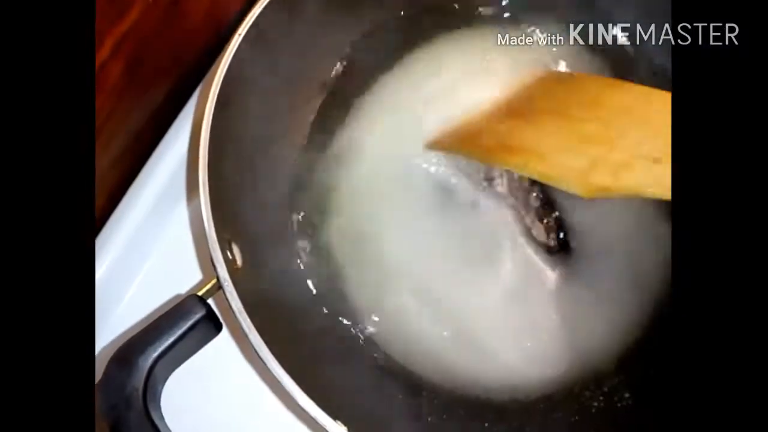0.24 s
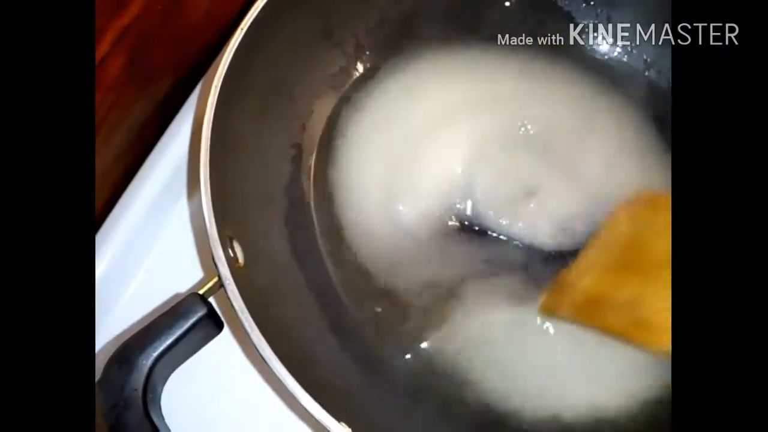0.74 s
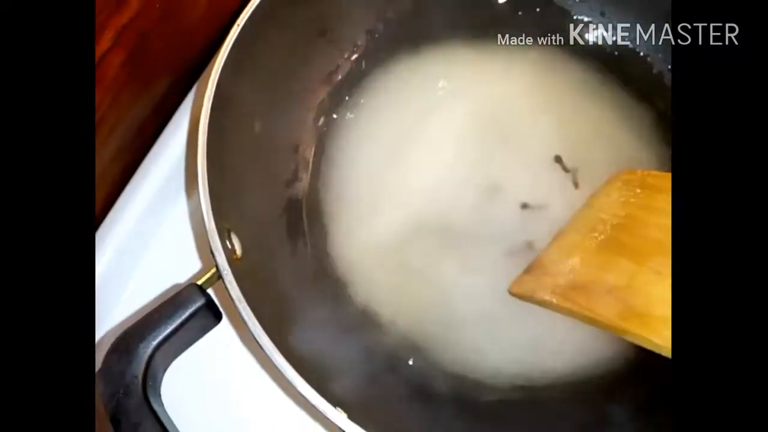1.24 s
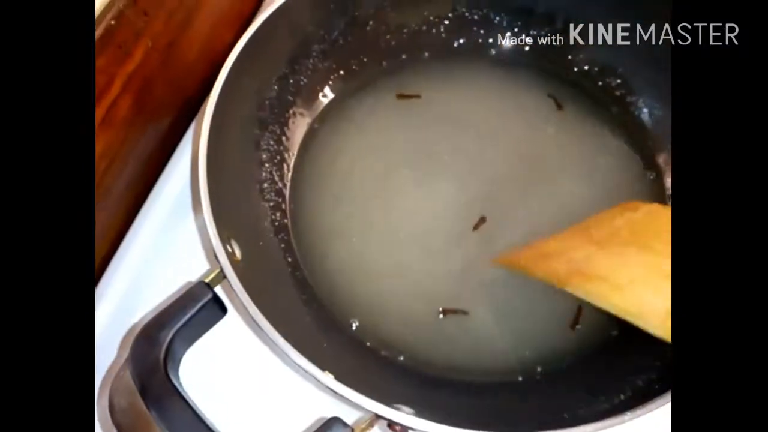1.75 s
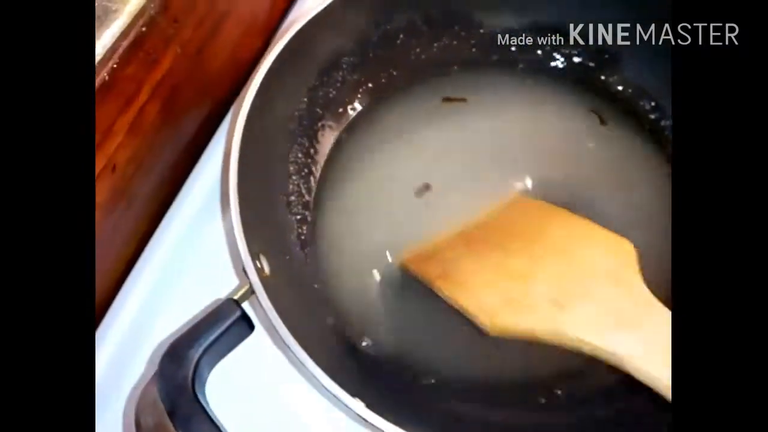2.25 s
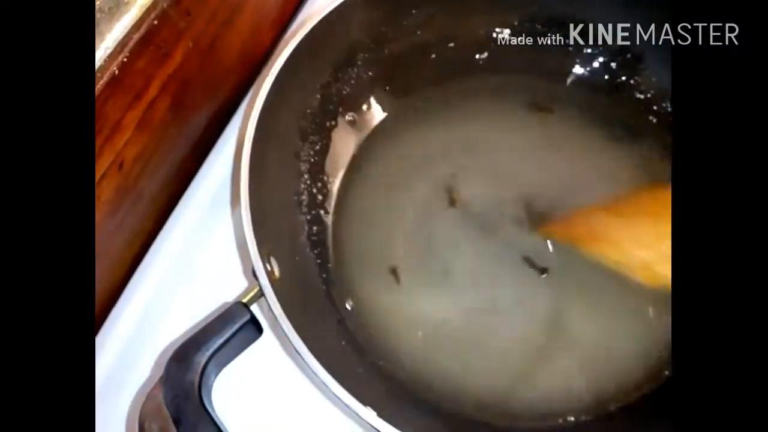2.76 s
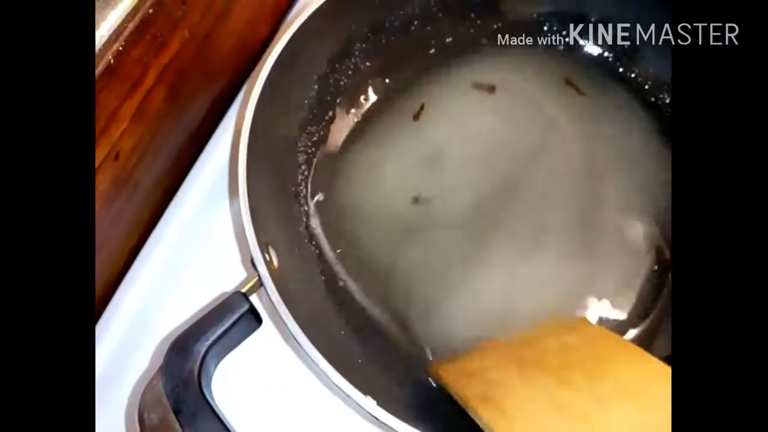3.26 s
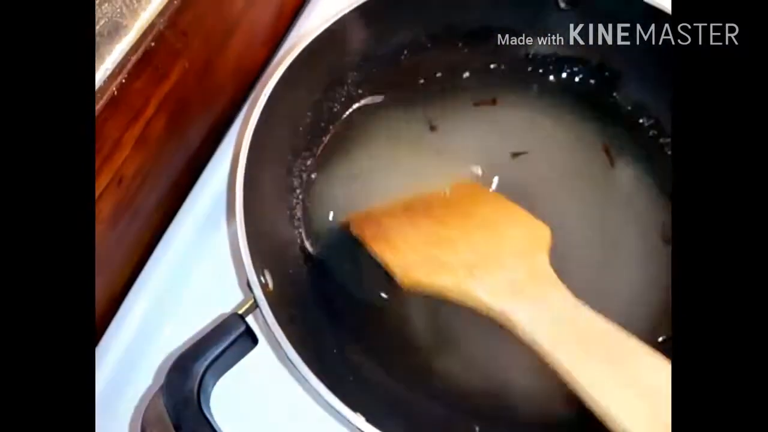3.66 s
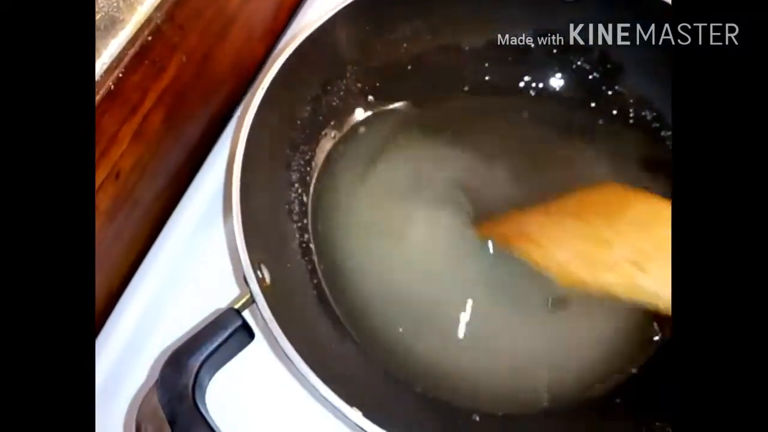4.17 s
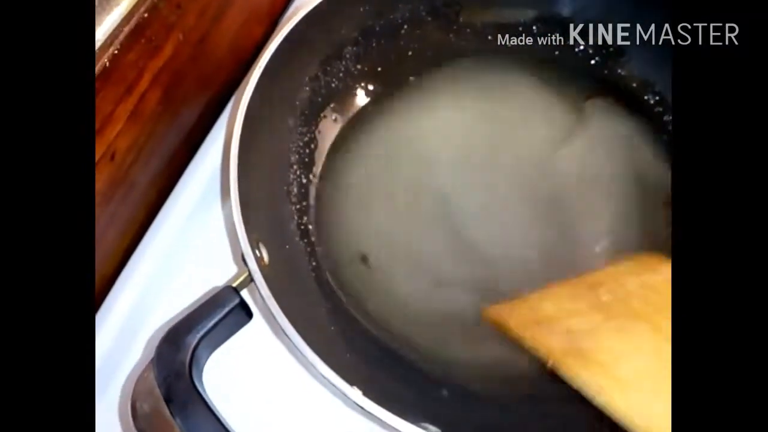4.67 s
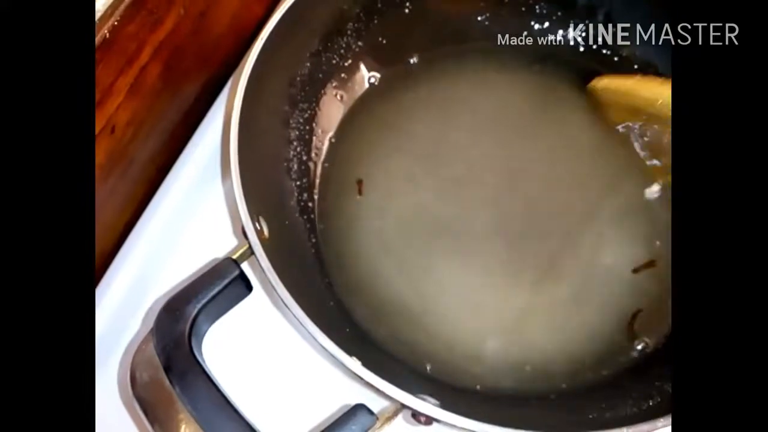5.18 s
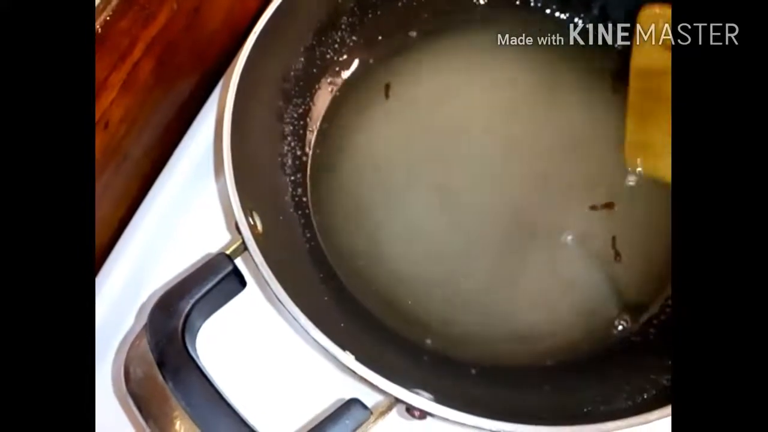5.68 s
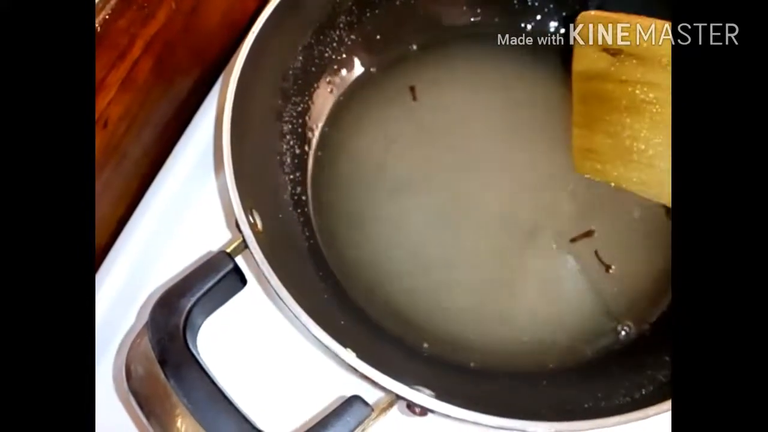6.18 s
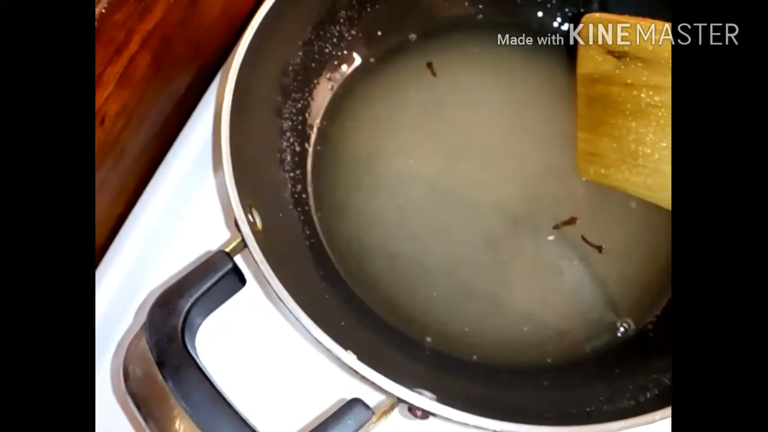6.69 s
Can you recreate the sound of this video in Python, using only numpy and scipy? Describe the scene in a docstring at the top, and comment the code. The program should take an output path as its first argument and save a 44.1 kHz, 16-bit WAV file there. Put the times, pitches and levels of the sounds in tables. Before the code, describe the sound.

Close gritty pan scraping: two loud crunchy strokes, a pause, softer squeaky wooden scrapes with clicks, then only quiet room hiss and hum.

```python
"""A kitchen with a soft hum: a wooden spatula scrapes the floor of a steel pan through wet sugar, close by.
The scrape is rough noise driving pan and blade resonances; the blade edge sings as gliding narrow noise.
Crystals grind, crackle as tiny damped tones and snap as short bursts that ring the pan.
At first the pan thumps (decaying tones), rattles (resonant noise) and judders (a buzz of uneven slips).
The kitchen is shaped noise and fuzzy drone bands; near the end the sound drops out and starts to fade back."""
import sys
import numpy as np
from scipy import signal
from scipy.fft import rfft, irfft, next_fast_len
from scipy.io import wavfile
from scipy.ndimage import map_coordinates

SR = 44100
rng = np.random.default_rng(int(sys.argv[2]) if len(sys.argv) > 2 else 0)


def unload_wav(signal):
    """Save mono or channel-first audio to the path in sys.argv[1] as 16-bit WAV at rate SR, clipped to [-1, 1]."""
    wavfile.write(
        sys.argv[1],
        SR,
        np.round(np.clip(np.atleast_2d(signal).T, -1, 1) * 32767).astype(np.int16),
    )


N = 305605

# Spatula strokes, one list a stroke: time_s, pressure_db, speed_db
STROKES = [
    [(0, -36, -44.5), (.05, -43, -51), (.13, -40.5, -47.5), (.165, -56, -58), (.4, -81, -66.5)],
    [(.475, -78, -62), (.503, -48, -44.5), (.53, -51, -56), (.6, -54.5, -43), (.69, -43.5, -39),
     (.745, -43.5, -44.5), (.8, -51, -49.5), (.815, -54, -60)],
    [(2.052, -44.5, -65), (2.1, -61, -62.5), (2.17, -53.5, -54)],
    [(2.175, -51.5, -55.5), (2.23, -51.5, -49.5), (2.4, -47.5, -50.5), (2.56, -55.5, -47.5),
     (2.59, -49, -58)],
    [(2.6, -56, -55), (2.72, -48.5, -54), (2.8, -50, -50.5), (2.98, -52, -46.5), (3.05, -57.5, -51),
     (3.13, -81, -58.5)],
    [(3.135, -69, -61), (3.19, -86, -53), (3.29, -54.5, -68.5), (3.36, -69, -64), (3.43, -81, -61)],
    [(3.452, -56, -47), (3.5, -54, -55), (3.64, -49.5, -52.5), (3.7, -51.5, -57.5), (3.79, -51.5, -60),
     (3.97, -60.5, -59.5), (4.03, -48.5, -60.5), (4.07, -66, -73), (4.115, -59, -59)],
    [(4.12, -52, -77), (4.145, -47, -49), (4.21, -55.5, -46), (4.28, -53, -42.5), (4.43, -52, -41.5),
     (4.45, -58, -44.5), (4.475, -72, -52)],
]
# How floor, wall, blade and rim follow a stroke: usual_level_db, db_per_pressure_db, db_per_speed_db
FOLLOW = {"floor": (-51, 0.38, 0.11), "wall": (-48.5, 1, -0.035), "blade": (-52, 1, 0.25),
          "rim": (-55.5, 0.21, 1)}
# Extra drive of the pan floor by strokes nearer the centre, in stroke order: drive_db
CENTRE_DRIVE = [2, 1, 13.5, 4.5, 6.5, 6, 2.5, 3]
# Extra ring of the rim by strokes nearer the edge, in stroke order: drive_db
EDGE_DRIVE = [1.5, -5, 7.5, 3.5, 3, 1, 5, 0]
# Pan floor resonances: pitch_hz, width_hz, level_db
FLOOR = [(148.5, 16.7, 13), (207, 75, -2.5)]
# Pan wall resonances: pitch_hz, width_hz, level_db
WALL = [(343.7, 35.4, 3.5), (485, 42.6, 6.5), (573, 85, -6.5)]
# Wooden blade on the steel: pitch_hz, width_hz, level_db
BLADE = [(700, 68, -0.5), (803, 80, 1.5), (891, 82, -2), (1074, 71, -8.5)]
# Pan rim resonances: pitch_hz, width_hz, level_db
RIM = [(1364, 68, 6), (1548, 137, 2), (1731, 69, 0)]
# High steel resonances the grit excites: pitch_hz, width_hz, level_db
STEEL = [(2250, 310, -8.5), (2940, 500, -4.5), (3245, 74, 2), (3568, 140, 3), (4570, 160, 0.5),
         (5010, 490, -4), (5910, 176, 1.5), (6237, 240, 2), (6540, 255, 3), (7340, 460, -7.5)]
# Undissolved sugar crunching, damped: pitch_hz, width_hz, level_db
CRUNCH = [(1950, 2300, -8.5), (5580, 1100, 7.5)]
# The finest crystals: pitch_hz, width_hz, level_db
FIZZ = [(9750, 1700, 4.5), (14800, 3900, -4)]
# The blade edge singing, one list a squeal: time_s, pitch_hz, level_db
SQUEALS = [
    [(2.185, 802, -63), (2.205, 785.8, -47), (2.33, 768, -45), (2.38, 813, -47), (2.44, 905, -49.5),
     (2.55, 931, -56)],
    [(3.47, 792, -59), (3.51, 775, -50), (3.56, 817, -54), (3.59, 810, -73), (3.63, 817, -42.5),
     (3.69, 831, -65), (3.83, 882, -51)],
]
# Crystals snapping and blade touch-downs: start_s, strength_db, knock_share_db, ping_share_db
SNAPS = [(0.0104, -32.5, 1, -6), (0.062, -34.5, -8, -14), (0.128, -44, -4, -14), (0.506, -32.5, -19, -19),
         (0.546, -37, -18.5, -11), (.562, -41.5, -16.5, -22), (0.613, -35.5, -19, -10),
         (0.685, -25, -24, -9), (0.742, -41, -6.5, -20), (2.048, -55.5, 16, -7), (2.0585, -61, 13, -15),
         (2.0953, -43.5, -12, -17), (2.1297, -37, -17.5, -30), (2.369, -31, -8, -31), (2.74, -41.5, -20, 2),
         (2.7646, -40, -23, -4), (2.793, -47, -32, -25), (2.823, -33, -18.5, -30),
         (2.8736, -36, -17.5, -18), (2.8875, -31.5, -18, -22), (3.156, -39.5, -9, -27),
         (3.2325, -53, -15, -25), (3.2597, -38, -3, -39), (3.4479, -29.5, -9.5, -15),
         (3.9329, -46.5, -9.5, -24), (3.999, -44, -0.5, -18), (4.0716, -47, -6, -13), (4.142, -34, -22, -8),
         (4.155, -34, -9, -27), (4.2493, -33, -23, -20), (4.3108, -34, -11.5, -13),
         (4.3984, -25.5, -19, 1.5)]
# The pan body under a knock, and the steel ping: pitch_hz, width_hz, level_db
KNOCK = [(149.0, 74, 1.0), (420, 340, -5.0), (1620, 190, 3.5)]
PING = [(3580, 120, -0.42)]
# The pan set down: pitch_hz, level_db, t60_s
THUMP = [(138.4, -20.5, 0.29), (213.5, -32.5, 0.3), (350.5, -37, 0.36), (454, -36.5, 0.15),
         (1118, -46.5, 0.5)]
# The pan rattling on the grate: pitch_hz, width_hz, level_db
CLATTER = [(1030, 330, -6), (1500, 400, -10), (1930, 120, 10)]
# The pan base sliding: time_s, slips_per_s, level_db
JUDDER = [(.13, 326, -57), (.21, 373, -43), (.25, 375, -46), (.3, 364, -43), (.37, 356, -48),
          (.385, 540, -81.5)]
# Multiples of the slip rate: multiple, level_db
SLIP_TONES = [(1, -1), (2, -4), (3, -11)]
# Colour of kitchen air and microphone hiss: pitch_hz, level_db_per_hz (relative)
HUSH = [(15, -62), (25, -15.5), (97, -11.5), (130, -9), (166, -8.5), (277, -15), (309, -15.5), (734, -19.5),
        (1040, -22), (3100, -28.5), (6400, -31), (7900, -39.5), (16000, -41.5)]
# Appliance drone and whine: pitch_hz, width_hz, level_db
DRONE = [(100, 29, -71), (172.8, 18.6, -65), (313.3, 25.3, -68.5), (10500, 72, -87), (15000, 700, -79)]
# Left-right likeness of the kitchen: pitch_hz, likeness (-1 to 1)
KITCHEN_ALIKE = [(60, 0.5), (240, 0.77), (950, -0.037)]
# Left-right likeness of the pan: pitch_hz, likeness (-1 to 1)
PAN_ALIKE = [(60, 1), (160, 1), (270, 0.8), (740, 0.85), (1220, 0.64), (3300, 0.13)]
# Left-right balance of the pan: pitch_hz, left_over_right_db
PAN_LEAN = [(140, 0.5), (330, -2.5), (700, -2), (3100, -1.5), (5500, 2.5), (9000, -4)]
# Decay of the room: pitch_hz, t60_s
ROOM = [(200, 0.49), (10000, 0.074)]

USUAL_DB = -50  # stroke pressure and speed count as usual at this level
LAND_S, LIFT_S, AWAY_DB = 0.006, 0.06, -27.5  # the blade lands fast, lifts off slower
THICK_UNTIL_S = 1  # thick and sharp sugar at first, dissolved later
WALL_THICK_DB, STEEL_THICK_DB = -4, -3.5  # thick sugar damps wall and blade, and the high steel
CRUNCH_THICK_DB, CRUNCH_THIN_DB = -2, -13.5
FIZZ_THICK_DB, FIZZ_THIN_DB = -5.5, -11
CRACKLE_DB = -9.0
BODY_SWELL_DB, STEEL_SWELL_DB = 2.2, 3  # how far each resonance swells on its own
SQUEAL_WIDTH_HZ, SQUEAL_CHATTER_DB = 55, 2.5
CRACK_RINGS_DB, KNOCK_RINGS_DB, PING_RINGS_DB = 8, 13.5, 22.5  # answers of steel, pan body and ping to a snap
PUSH_S, PUSH_DB = 0.00032, 0  # a knock starts with a short push
CLATTER_DB, CLATTER_T60_S = -39.5, 0.53
SLIP_DULLS_DB_PER_S = 43  # fade per step up in multiple
HUSH_DB = -61
PORT_LAG_S = 5e-5  # the pan reaches the left port later
ROOM_DB = -9.5
OPEN_DB, CUT_DB = 1.2, -100
CUT_S, BACK_S, BACK_DB, FADE_DB_PER_S = 6.809, 6.855, -30.5, 264.5  # cut-out, then the fade back in
TOP_HZ = 15830


def scrape():
    """The blade's drag rings the pan's floor, wall and rim, its own wood, and the high steel resonances."""
    pressure, speed, centre, edge, touch = stroke_controls()
    gain = {part: touch * amp(db + per_pressure * pressure + per_speed * speed)
            for part, (db, per_pressure, per_speed) in FOLLOW.items()}
    thick = np.arange(N) < THICK_UNTIL_S * SR
    gain["floor"] = gain["floor"] * amp(centre)
    gain["rim"] = gain["rim"] * amp(edge)
    gain["wall"] = gain["wall"] * amp(thick * WALL_THICK_DB)
    gain["blade"] = gain["blade"] * amp(thick * WALL_THICK_DB)
    gritty = touch * amp(USUAL_DB + speed)

    rub = grinding(1200, spread_db=-1.8, rough_db=0.45)
    grit = grinding(2000, spread_db=1.7, rough_db=1.93)
    sharp = grinding(900, spread_db=-1.0, rough_db=3.5)
    parts = {"floor": FLOOR, "wall": WALL, "blade": BLADE, "rim": RIM}
    body = sum(gain[name] * unit(ring(rub, table, BODY_SWELL_DB)) for name, table in parts.items())
    # the pan is too small to radiate deep bass
    body = filtered(body, lambda hz: (1j * hz / (100 + 1j * hz)) ** 2)

    crystals = amp(CRACKLE_DB) * gritty * crackle(1100, pitch_hz=4920, spread=0.34, cycles=3.9, spread_db=7)
    crunch_gain = amp(np.where(thick, CRUNCH_THICK_DB, CRUNCH_THIN_DB)) * gritty
    crunch = crunch_gain * unit(ring(sharp, CRUNCH, shift_db=-0.5))
    fizz_gain = amp(np.where(thick, FIZZ_THICK_DB, FIZZ_THIN_DB)) * gritty ** 1.28  # faster is brighter
    fizz = fizz_gain * unit(ring(grit, FIZZ, shift_db=0.5))
    steel = amp(thick * STEEL_THICK_DB) * gritty * unit(ring(grit, STEEL, STEEL_SWELL_DB))
    return body + squeal() + steel + crunch + fizz + crystals


def stroke_controls():
    """Pressure, speed, floor and rim drive in dB over a usual stroke, and the gain of blade contact."""
    pressure, speed = curves([row for stroke in STROKES for row in stroke]) - USUAL_DB
    drives = [(row[0], floor_db, rim_db)
              for stroke, floor_db, rim_db in zip(STROKES, CENTRE_DRIVE, EDGE_DRIVE)
              for row in (stroke[0], stroke[-1])]
    centre, edge = curves(drives)
    touch_db = []
    for rows in STROKES:
        start, end = rows[0][0], rows[-1][0]
        contact = [(start - LAND_S, AWAY_DB), (start, 0), (end, 0), (end + LIFT_S, AWAY_DB)]
        touch_db.append(curves(contact)[0])
    return pressure, speed, centre, edge, amp(np.max(touch_db, axis=0))


def squeal():
    """The blade edge sings: narrow noise whose pitch glides while its level chatters."""
    total = 0
    for rows in SQUEALS:
        pitch = curves(rows)[0]
        level_db = curves(rows, left=-120, right=-120)[1] + SQUEAL_CHATTER_DB * wobble(40)
        total = total + amp(level_db) * narrow(pitch, SQUEAL_WIDTH_HZ)
    return total


def grinding(per_s, spread_db, rough_db):
    """Force under the blade: crystals of uneven size break at random over a rough rub."""
    breaks = rng.random(N) < per_s / SR
    size = amp(spread_db * rng.exponential(size=N)) * breaks
    force = rng.standard_normal((2, N)) * (.5 + unit(size))
    return force * amp(rough_db * (wobble(12) / 2 + wobble(45)))


def crackle(per_s, pitch_hz, spread, cycles, spread_db):
    """Single crystals breaking, each a short damped tone of its own pitch and size, rms 1."""
    when, size, pan = rng.random((int(per_s * N / SR), 4)).T[:3, :, None]
    hz = np.clip(pitch_hz * np.exp(spread * rng.standard_normal(when.shape)), 800, 14000)
    length = 256
    t = np.arange(length) / SR
    grain = amp(spread_db * size ** 2) * np.exp(-hz * t / cycles) * np.sin(2 * np.pi * hz * t)
    at = ((when * N).astype(int) + np.arange(length)).ravel()
    sides = []
    for phase in (0, np.pi / 2):  # left and right gains a quarter turn apart
        placed = (grain * np.cos(2 * np.pi * pan + phase)).ravel()
        sides.append(np.bincount(at, placed, N + length)[:N])
    return unit(np.array(sides))


def snaps():
    """Each snap is a few milliseconds of crack into the steel, with a duller knock, a ping and a bright edge."""
    length = SR // 20
    crack, knock, ping = np.zeros((3, 2, N + length))
    t = np.arange(length) / SR
    push = amp(PUSH_DB) * t / PUSH_S * np.exp(1 - t / PUSH_S) * (1 - t / PUSH_S / 2)
    for start_s, db, knock_db, ping_db in SNAPS:
        burst = rng.standard_normal((2, length)) * amp(-60 * t / 0.022) * (1 - np.exp(-t / 0.00017))
        start = round(start_s * SR)
        at = slice(start, start + length)
        crack[:, at] += amp(db + CRACK_RINGS_DB) * burst
        knock[:, at] += amp(db + knock_db + KNOCK_RINGS_DB) * (burst + push)
        ping[:, at] += amp(db + ping_db + PING_RINGS_DB) * burst
    steel = ring(crack, STEEL, shift_db=2.5)
    crunch = amp(-15.0) * ring(crack, CRUNCH)
    edge = amp(-19.5) * ring(crack, FIZZ)
    thud = ring(knock, KNOCK) + amp(1.0) * ring(knock, FLOOR)  # a knock sets the pan floor ringing
    return (steel + crunch + edge + thud + ring(ping, PING))[:, :N]


def pan_shift():
    """The pan thumps and rattles on the stove, then its base judders in quick uneven slips."""
    t = np.arange(N) / SR
    thump = 0
    for hz, db, t60 in THUMP:
        level = amp(db - 60 * t / t60 + 0.66 * wobble(31))
        thump = thump + level * np.cos(2 * np.pi * hz * (t + 4e-5 * wobble(90)))

    rattle = unit(ring(grinding(550, spread_db=2.5, rough_db=3.0), CLATTER))
    clatter = amp(CLATTER_DB - 60 * t / CLATTER_T60_S) * rattle

    slip_rate, judder_db = curves(JUDDER, left=-120, right=-120)
    slip_rate = curves(JUDDER)[0]  # the rate holds steady outside the table, the level does not
    turn = 2 * np.pi * np.cumsum(slip_rate * (1 + 0.03 * wobble(129.2))) / SR
    since = t - JUDDER[1][0]
    slips = 0
    for k, db in SLIP_TONES:
        dulling_db = (k - 1) * SLIP_DULLS_DB_PER_S * since  # higher multiples fade with time
        slips = slips + amp(db - dulling_db + 3.1 * wobble(60)) * np.cos(k * turn)
    return thump + stereo(clatter, PAN_ALIKE) + amp(judder_db) * slips


def kitchen():
    """Soft air and hiss as shaped noise, with a few fuzzy drone bands."""
    air = unit(filtered(rng.standard_normal((2, N)), lambda hz: amp(along(HUSH, hz))))
    hush = amp(HUSH_DB + 0.18 * wobble(2.68)) * air
    drone = sum(amp(db) * narrow(hz, width) for hz, width, db in DRONE)
    return stereo(hush + drone, KITCHEN_ALIKE)


def room(x):
    """The kitchen's answer: a noise tail in which each frequency dies at its own speed."""
    hz, t, z = signal.stft(rng.standard_normal((2, SR // 2)), SR, nperseg=256)
    decay = amp(-60 * t / along(ROOM, hz)[:, None])
    tail = signal.istft(z * decay, SR, nperseg=256)[1]
    return signal.fftconvolve(x, tail / np.linalg.norm(tail[0]), axes=1)[:, :N]


def ring(force, table, shift_db=0):
    """A force through resonances; each swells and flickers on its own as the contact point moves."""
    count = force.shape[1]
    total = 0
    for k, (hz, width, db) in enumerate(table):
        swell = wobble(9, count) + 0.57 * wobble(33, count)
        tone = signal.lfilter(*signal.iirpeak(hz, hz / width, SR), force)
        total = total + (-1) ** k * amp(db + shift_db * swell) * tone  # neighbours alternate in sign
    return total


def narrow(hz, width_hz):
    """A pair of narrow noises around a pitch that may move, rms 1."""
    slow = filtered(rng.standard_normal((4, N)), lambda f: 1 / (1 + 2j * f / width_hz) ** 2)
    carrier = np.exp(2j * np.pi * np.cumsum(hz * np.ones(N)) / SR)
    return unit(np.real((slow[:2] + 1j * slow[2:]) * carrier))


def stereo(pair, alike):
    """Mixes two signals so that unrelated ones gain the given left-right likeness."""
    turn = lambda hz: np.arccos(np.clip(along(alike, hz), -1, 1)) / 2
    mid, side = filtered(pair, lambda hz: np.array([np.cos(turn(hz)), np.sin(turn(hz))]))
    return np.array([mid + side, mid - side])


def filtered(x, response):
    """x through a complex response of frequency, padded against wrap-around."""
    m = next_fast_len(N + SR // 2)
    return irfft(rfft(x, m) * response(np.fft.rfftfreq(m, 1 / SR)), m)[..., :N]


def wobble(rate, count=N):
    """A smooth random curve, rate knots a second."""
    coarse = np.arange(0, count + 64, 64)
    knots = rng.standard_normal(int(count * rate / SR) + 4)
    return np.interp(np.arange(count), coarse, map_coordinates(knots, [coarse * rate / SR]))


def curves(rows, **ends):
    """One value per sample for each column after the time."""
    s, *cols = np.transpose(rows)
    return np.array([np.interp(np.arange(N) / SR, s, c, **ends) for c in cols])


def along(points, hz):
    """Reads (Hz, value) points on a log frequency axis."""
    f, v = np.transpose(points)
    return np.interp(np.log(hz + 1), np.log(f + 1), v)


def unit(x):
    """x at rms 1."""
    return x / np.sqrt(np.mean(np.abs(x) ** 2) + 1e-20)


def amp(db):
    """Gain of a level in dB."""
    return 10 ** (np.asarray(db) / 20)


def scene():
    """The pan reaches two microphone ports with different strength and a short lag; room and kitchen join."""
    pan = stereo(scrape() + snaps(), PAN_ALIKE) + pan_shift()
    side = np.array([[1], [-1]])  # left, right
    lean = lambda hz: amp(side * along(PAN_LEAN, hz) / 2)
    lag = lambda hz: np.exp(-1j * np.pi * side * hz * PORT_LAG_S)
    pan = filtered(pan, lambda hz: lean(hz) * lag(hz))
    return pan + amp(ROOM_DB) * stereo(room(pan), PAN_ALIKE) + kitchen()


def record(dry):
    """The sound drops out briefly; the microphone is weak in deep bass and keeps nothing above its band limit."""
    t = np.arange(N) / SR
    fade_db = BACK_DB + FADE_DB_PER_S * (t - BACK_S)
    gain_db = np.select([t < CUT_S, t < BACK_S], [OPEN_DB, CUT_DB], fade_db)
    return filtered(dry * amp(gain_db), lambda hz: (hz < TOP_HZ) * 1j * hz / (50 + 1j * hz))


dry = scene()
out = record(dry)
unload_wav(out)
```